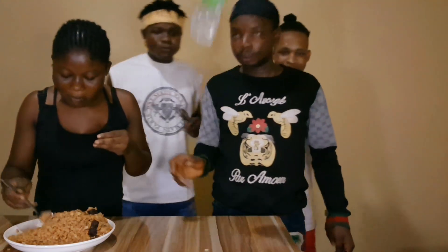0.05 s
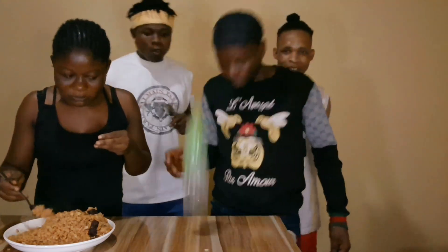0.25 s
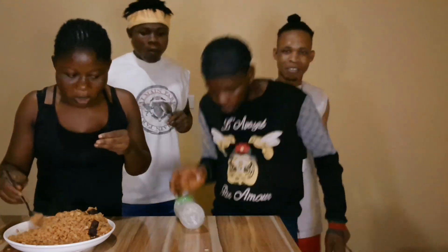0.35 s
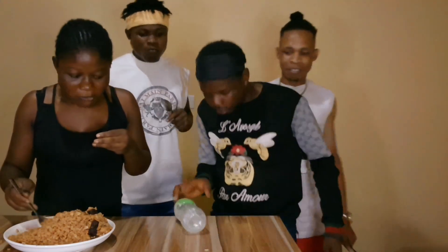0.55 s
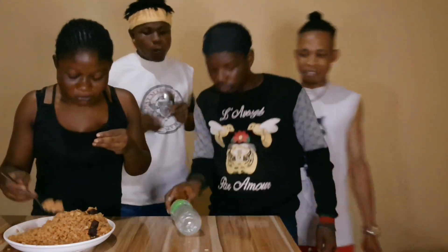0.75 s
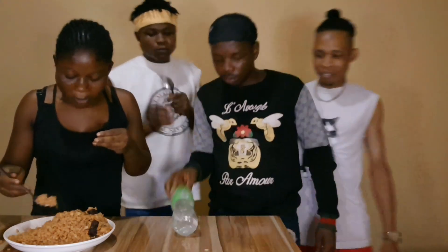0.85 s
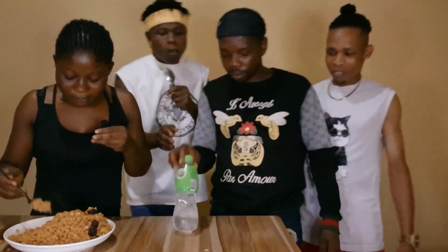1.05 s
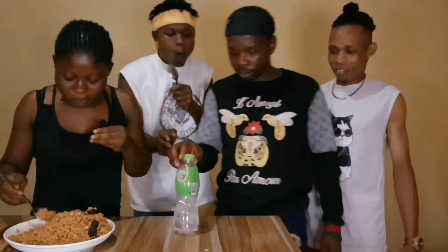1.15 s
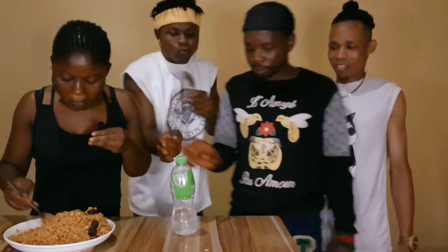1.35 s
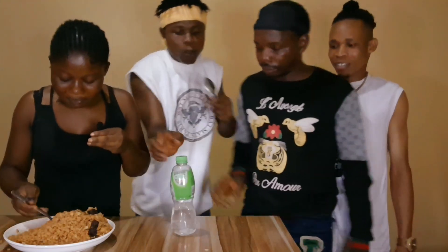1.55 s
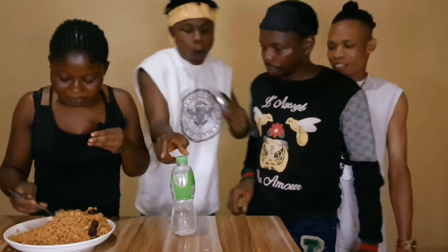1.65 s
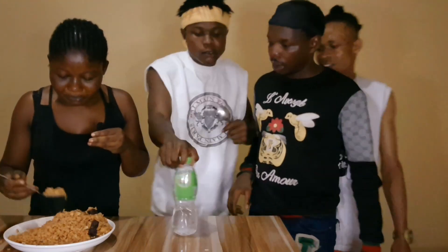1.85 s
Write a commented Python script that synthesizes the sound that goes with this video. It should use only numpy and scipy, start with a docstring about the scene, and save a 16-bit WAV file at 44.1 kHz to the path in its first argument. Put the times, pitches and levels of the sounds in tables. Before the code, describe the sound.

A flipped plastic bottle hits a wooden tabletop at about 0.2 seconds with a loud, sharp crack, woody ring and short bare-room echo. Water inside thumps dully until 0.5. A faint scrape and tiny ticks follow, then a hoarse slide near 0.95. Around 1.2-1.5 come soft finger knocks and low rubbing, with another slight rub near 1.8. Quiet hum and clothes rustle underneath, in stereo.

```python
"""A small, bare room with a wooden table, heard in stereo through two microphones.
From the start: a low wavering hum and room noise, and clothes rustling in dense random slips.
A flipped plastic bottle with some water in it lands: filtered impulses excite a crackling noise burst,
the modes of tabletop and shell, and the room's reflections; the water thumps in decaying sines.
Then the bottle scrapes, ticks, rubs, slides upright and is knocked by fingers, in slips, clicks and modes."""
import sys
import numpy as np
from scipy import signal
from scipy.fft import rfft, irfft
from scipy.io import wavfile

SR = 44100
rng = np.random.default_rng(int(sys.argv[2]) if len(sys.argv) > 2 else 0)


def waveform_to_disk(signal):
    """Save audio, clipped to [-1, 1], as 16-bit WAV at the path in sys.argv[1]."""
    frames = np.transpose(np.atleast_2d(signal))
    scaled = np.clip(frames, -1, 1) * 32767
    samples = np.round(scaled).astype(np.int16)
    wavfile.write(sys.argv[1], SR, samples)


N = 83790  # samples, 1.9 s


def undb(db):
    """Decibels to gain."""
    return 10 ** (np.asarray(db) / 20)


def unit(x):
    """Scale to rms 1, over both channels together."""
    return x / np.sqrt(np.mean(x ** 2))


def at(points, hz, axis=1):
    """Read a column of a table over log frequency."""
    rows = np.array(points, float)
    return np.interp(np.log(hz + 1e-9), np.log(rows[:, 0]), rows[:, axis])


def clock():
    """Time of every sample, in seconds."""
    return np.arange(N) / SR


def bins():
    """Frequency of every spectral bin, in Hz."""
    return np.arange(N // 2 + 1) * SR / N


def pan(difference_db):
    """Left and right gains for a level difference, left minus right."""
    return undb(np.array([[difference_db], [-difference_db]]) / 2)


def colour(x, points):
    """Give a sound a spectrum, at rms 1."""
    return unit(irfft(rfft(x) * undb(at(points, bins())), N))


def through(x, response):
    """Play a sound through a stereo response."""
    return signal.fftconvolve(np.atleast_2d(x), response, axes=1)[:, :N]


def fade(t60):
    """Exponential decay that falls 60 dB in t60 seconds."""
    return np.exp(-np.log(1000) * clock() / t60)


def ring(modes):
    """Decaying sine modes; neighbours start in opposite directions."""
    out = np.zeros(N)
    for k, (hz, db, t60) in enumerate(modes):
        out += (-1) ** k * undb(db) * np.sin(2 * np.pi * hz * clock()) * fade(t60)
    return out


# diffuse sound at the two microphones: pitch_hz, likeness (0-1), left_minus_right_db
DIFFUSE_FIELD = [(60, 1, 5), (250, 0.8, -0.5), (600, 0.4, 3), (1400, 0, 4), (3000, 0, 4), (6000, 0, 1),
                 (13000, 0, -0.5)]


def diffuse(pair):
    """Two unrelated sounds become one field: alike in the bass, wide in the treble."""
    mid, side = rfft(pair)
    alike = np.clip(at(DIFFUSE_FIELD, bins()), -.99, .995)
    lean = undb(at(DIFFUSE_FIELD, bins(), axis=2) / 2)
    mid = mid * np.sqrt(1 + alike)
    side = side * np.sqrt(1 - alike)
    return unit(irfft(np.array([(mid + side) * lean, (mid - side) / lean]), N))


GRAINS_PER_S, GRAIN_SPREAD_DB, GRAIN_TAIL_S = 880, 5.5, 0.037


def friction(level, points):
    """Dense tiny slips of random strength, each with a noisy tail, follow a level curve."""
    chosen = rng.random((2, N)) < GRAINS_PER_S / SR
    strength = rng.standard_normal((2, N)) * undb(GRAIN_SPREAD_DB * rng.standard_normal((2, N)))
    smear = rng.standard_normal((2, N)) * np.exp(-clock() / GRAIN_TAIL_S)
    texture = colour(diffuse(through(chosen * strength, smear)), points)
    return texture * undb(np.interp(clock(), *np.array(level).T))


# decay of the bare room: pitch_hz, t60_s
ROOM_DECAY = [(80, 1), (210, 0.75), (560, 0.56), (1470, 0.51), (3880, 0.48), (10200, 0.38)]
ECHO_BUILD_S = 0.002


def room(points):
    """Dense reflections of a given colour build up; each half octave dies at its own rate."""
    field = rfft(colour(diffuse(rng.standard_normal((2, N))), points))
    band = np.round(2 * np.log2(np.maximum(bins(), 20)))
    out = np.zeros((2, N))
    for k in np.unique(band):
        out += irfft(field * (band == k), N) * fade(at(ROOM_DECAY, 2 ** (k / 2)))
    return out * (1 - np.exp(-clock() / ECHO_BUILD_S))


def waver():
    """A slow random wander through 24 points with a spread near 1."""
    t = clock()
    return np.interp(t, np.linspace(0, t[-1], 24), rng.standard_normal(24))


# hum in the room, before it wavers: pitch_hz, level_db (rms)
HUM_TONES = [(91.5, -56.5), (183, -68.5)]
HUM_WAVER_DB, HUM_WAVER_RAD = 6.5, 0.19


def hum():
    """Low sines waver slowly in level and phase, equal at both microphones."""
    out = np.zeros(N)
    for hz, db in HUM_TONES:
        gain = np.sqrt(2) * undb(db + HUM_WAVER_DB * waver())
        out += gain * np.sin(2 * np.pi * hz * clock() + HUM_WAVER_RAD * waver())
    return out


# colour of the room noise: pitch_hz, level_db (per Hz, relative)
AIR_COLOUR = [(20, -35.5), (33, -24), (48, -1), (65, -7), (95, 1), (130, -3.5), (170, -1.5), (250, -9),
              (370, -8.5), (700, -20.5), (1500, -24), (4000, -31), (8000, -37.5), (16000, -36)]
AIR_DB = -55.5  # rms


def room_noise():
    """Steady diffuse noise, strongest in the bass."""
    return undb(AIR_DB) * colour(diffuse(rng.standard_normal((2, N))), AIR_COLOUR)


# clothes, loudness over time: time_s, level_db
CLOTHES_LEVEL = [(0, -71), (.08, -70), (.11, -59.5), (.2, -56), (.45, -61), (.56, -56.5), (.69, -59.5),
                 (.78, -61), (.86, -66), (.92, -60), (.99, -68), (1.07, -54), (1.2, -73), (1.28, -67),
                 (1.35, -56.5), (1.46, -61.5), (1.56, -76), (1.63, -66.5), (1.7, -72), (1.79, -62.5),
                 (1.9, -62)]
# clothes, colour: pitch_hz, level_db (per Hz, relative)
CLOTHES_COLOUR = [(300, 4.5), (1200, 4.5), (2200, 3), (4500, -0.5), (6000, -1), (8000, 2), (9500, -6),
                  (16000, -7.5)]


def clothes():
    """Cloth rustles in dense slips that swell and sink."""
    return friction(CLOTHES_LEVEL, CLOTHES_COLOUR)


# crack of a contact: pitch_hz, level_db (per Hz, relative), left_minus_right_db
CRACK_COLOUR = [(100, 2.5, -0.5), (305, -18.5, 4), (653, 14, 6), (1000, 8.5, 1.5), (1570, -8, 3),
                (2300, -19, 4.5), (3300, 5.5, -3.5), (4100, -6, 4), (5140, 0, -0.5), (6100, -16.5, -4.5),
                (7800, 0.5, 3.5), (9500, -25.5, 3.5), (12800, -19, -16), (15900, -17, -1)]
CRACK_S = 0.0018  # decay time


def crack():
    """A contact's very short burst of noise leans left or right with pitch."""
    burst = rfft(colour(rng.standard_normal(N), CRACK_COLOUR))
    lean = undb(at(CRACK_COLOUR, bins(), axis=2) / 2)
    pair = irfft(np.array([burst * lean, burst / lean]), N) * np.exp(-clock() / CRACK_S)
    return pair * np.sqrt(CRACK_S * SR / np.sum(pair ** 2))  # fixed energy for every draw


# modes of the wooden tabletop: pitch_hz, level_db (relative)
TABLE_MODES = [(105, -20.5), (124, -10.5), (173, -7), (213, -4.5), (265, -2.5), (426, 1.5), (437, -4.5),
               (462, -5.5), (532, -2.5), (586, -3.5), (609, -5), (640, -3), (706, -1.5), (742, -7.5),
               (783, 0), (948, -12), (1117, -22)]
TABLE_T60_S, TABLE_T60_SLOPE = 0.41, 0.42  # t60 at 500 Hz; power by which it falls with pitch


def tabletop():
    """The wood rings longer in its low modes."""
    return ring([(hz, db, TABLE_T60_S * (hz / 500) ** -TABLE_T60_SLOPE) for hz, db in TABLE_MODES])


# modes of the plastic shell: pitch_hz, level_db (relative), t60_s
SHELL_MODES = [(1270, -6, 0.42), (1754, -7, .2), (1823, -5, .16), (2708, -2.5, 0.039), (2887, -3.5, .1),
               (3330, 8.5, 0.016), (4800, 7, 0.0056), (7620, -0.5, 0.0086)]


def shell():
    """The thin plastic rings in modes, the highest of them very short."""
    return ring(SHELL_MODES)


# the room's answer to a blow: pitch_hz, level_db (per Hz, relative)
ECHO_COLOUR = [(30, -33.5), (60, -15.5), (120, -20.5), (200, -5), (335, -9), (450, -3.5), (720, -3.5),
               (860, -9.5), (1000, -8.5), (1700, -12), (2400, -15.5), (2800, -18.5), (3400, -13),
               (4800, -19.5), (6000, -26), (7800, -22), (9500, -33.5), (16000, -30.5)]


def echo():
    """The bare room answers a blow with coloured reflections."""
    return room(ECHO_COLOUR)


# blows on the table: start_s, level_db (relative), brightness_hz (low for a soft contact)
TABLE_BLOWS = [(0.2096, -1, 13300), (.2205, -14, 820), (1.187, -43, 1200), (1.2602, -40, 1280),
               (1.278, -40, 600), (1.323, -36.5, 1000)]
CRACK_DB, TABLE_DB, SHELL_DB, ECHO_DB = -9, -19, -21, -13.5
TABLE_PAN_DB, SHELL_PAN_DB = 3, 4.5  # left minus right
TOP_HZ = 16100  # top of the recorder's range


def bottle_on_table():
    """Each blow excites crack, table, shell and room; soft blows reach only the low modes."""
    body = undb(CRACK_DB) * crack()
    body = body + undb(TABLE_DB) * tabletop() * pan(TABLE_PAN_DB)
    body = body + undb(SHELL_DB) * shell() * pan(SHELL_PAN_DB)
    body = body + undb(ECHO_DB) * echo()
    force = np.zeros(N)
    for start, db, hz in TABLE_BLOWS:
        push = signal.unit_impulse(N, int(start * SR)) + 1e-18  # inaudible offset
        force += undb(db) * signal.lfilter(*signal.butter(2, min(hz, TOP_HZ), fs=SR), push)
    return through(force, body)


# water in the bottle: start_s, level_db (before rise and decay), pitch_hz
WATER_THUMPS = [(0.211, -13, 123), (0.305, -22, 110), (.325, -21, 163), (.358, -23, 104),
                (0.431, -24, 119.4), (.474, -28.5, 175.6), (1.279, -44, 171), (1.346, -35.5, 100),
                (1.386, -36, 97), (1.462, -42.5, 92)]
THUMP_RISE_S, THUMP_DECAY_S = .005, 0.02


def water():
    """The water falls back in the bottle, each surge a low, quickly damped thump."""
    out = np.zeros(N)
    for start, db, hz in WATER_THUMPS:
        age = np.maximum(clock() - start, 0)
        swell = (1 - np.exp(-age / THUMP_RISE_S)) * np.exp(-age / THUMP_DECAY_S)
        out += undb(db) * np.sin(2 * np.pi * hz * age) * swell
    return out


# brief scrape of plastic, loudness over time: time_s, level_db
SETTLING_LEVEL = [(.45, -84), (.51, -55), (.58, -57.5), (.65, -66), (.72, -70)]
# scrape, colour: pitch_hz, level_db (per Hz, relative)
SETTLING_COLOUR = [(1500, -19), (2900, -5), (4000, -5), (4900, -4.5), (5800, -10), (9000, -25)]


def scrape():
    """Plastic slips briefly on the wood as the bottle settles."""
    return friction(SETTLING_LEVEL, SETTLING_COLOUR)


# small plastic ticks: start_s, level_db (relative), pitch_hz
PLASTIC_TICKS = [(0.6416, -43, 7800), (0.7841, -50.5, 7000), (1.1887, -49.5, 3350), (1.3237, -39, 1230),
                 (1.405, -44, 4700), (1.426, -50, 3930), (1.4694, -48.5, 8200)]
TICK_S, TICK_OCTAVES, TICK_ROOM_DB = 0.001, 0.31, -14  # decay; distance to half amplitude; room tail


def ticks():
    """Short clicks of narrow-band noise, each with a faint tail from the room."""
    t, direct = clock(), np.zeros(N)
    for start, db, hz in PLASTIC_TICKS:
        shape = 1 / (1 + (np.log2((bins() + 1) / hz) / TICK_OCTAVES) ** 2)
        click = unit(irfft(rfft(rng.standard_normal(N)) * shape, N))
        direct += undb(db) * click * (t >= start) * np.exp(-abs(t - start) / TICK_S)
    tail = room([(20, 0), (20000, 0)]) / np.sqrt(TICK_S * SR / 2)  # allow for a click's energy
    return direct + undb(TICK_ROOM_DB) * through(direct, tail)


# the bottle's base on the wood, loudness over time: time_s, level_db
BASE_LEVEL = [(.8, -80), (.89, -52), (1, -66), (1.18, -62), (1.25, -52), (1.33, -42), (1.4, -45.5),
              (1.47, -56), (1.55, -70), (1.72, -60.5), (1.78, -53.5), (1.9, -63.5)]
# base on the wood, colour: pitch_hz, level_db (per Hz, relative)
BASE_COLOUR = [(50, -12.5), (100, 6), (170, 9.5), (230, -3.5), (340, 1), (410, 0.5), (500, -1.5),
               (590, -0.5), (820, -12.5), (1000, -16), (1300, -22), (2500, -27.5), (6000, -47.5)]


def rub():
    """The base rubs on the wood in dull, low slips."""
    return friction(BASE_LEVEL, BASE_COLOUR)


# the bottle sliding upright, loudness over time: time_s, level_db
UPRIGHT_LEVEL = [(.88, -80), (.95, -58), (1.01, -63.5), (1.1, -76)]
# sliding upright, colour: pitch_hz, level_db (per Hz, relative)
UPRIGHT_COLOUR = [(500, -26.5), (680, -1), (1000, -14), (1270, 5.5), (1600, -13.5), (3000, -19.5),
                  (6000, -37)]


def slide():
    """Slips peaking in narrow bands make a faint, hoarse squeak."""
    return friction(UPRIGHT_LEVEL, UPRIGHT_COLOUR)


# fingers on the bottle: start_s, level_db (relative)
FINGER_KNOCKS = [(1.1874, -47), (1.222, -50), (1.279, -44), (1.322, -50.5), (1.4, -47.5)]
# hollow ring of the bottle: pitch_hz, level_db (relative), t60_s
HOLLOW_MODES = [(461, -9, 0.44), (494, 1.5, 0.13), (540, -13, 0.26), (837, -4.5, 0.043)]


def knocks():
    """Each finger knock is an impulse that sets off the bottle's hollow modes."""
    force = np.zeros(N)
    for start, db in FINGER_KNOCKS:
        force += undb(db) * signal.unit_impulse(N, int(start * SR))
    return through(force, ring(HOLLOW_MODES) * pan(TABLE_PAN_DB))


def scene():
    """Room and clothes, then the landing and its water, then the handling."""
    place = hum() + room_noise() + clothes()
    landing = bottle_on_table() + water()
    handling = scrape() + ticks() + rub() + slide() + knocks()
    return place + landing + handling


def record(dry):
    """The recorder rounds the highest peaks and cuts the top."""
    rounded = dry / (1 + (dry / .95) ** 6) ** (1 / 6)
    lowpass = signal.ellip(10, .1, 70, TOP_HZ, fs=SR, output="sos")
    return signal.sosfilt(lowpass, rounded)


dry = scene()
out = record(dry)
waveform_to_disk(out)
```